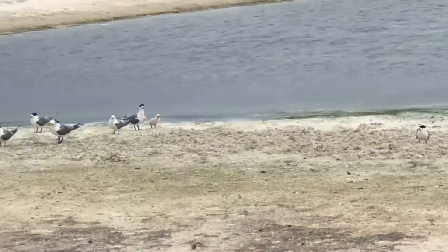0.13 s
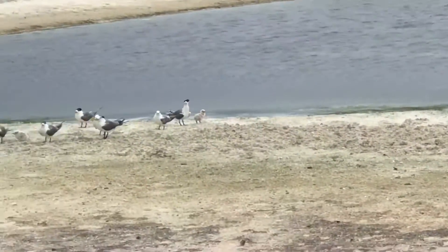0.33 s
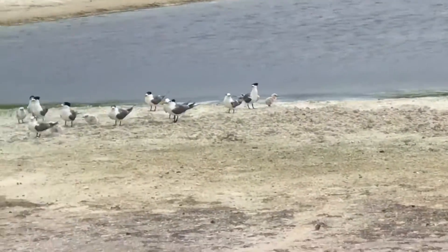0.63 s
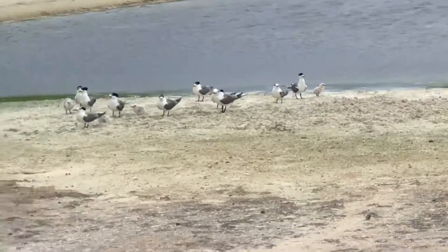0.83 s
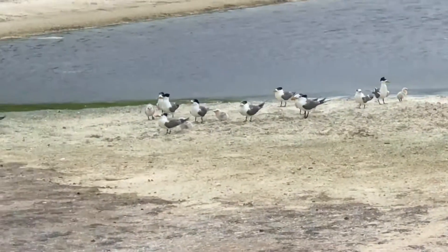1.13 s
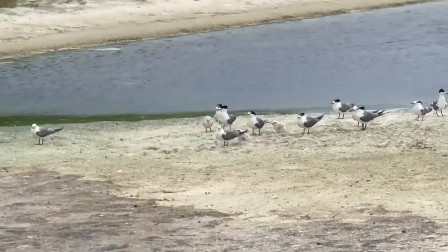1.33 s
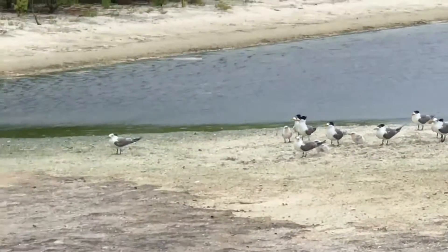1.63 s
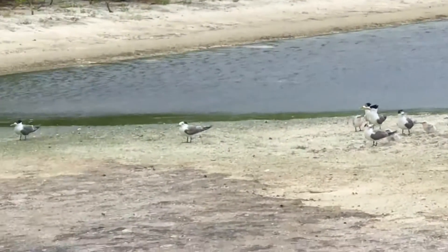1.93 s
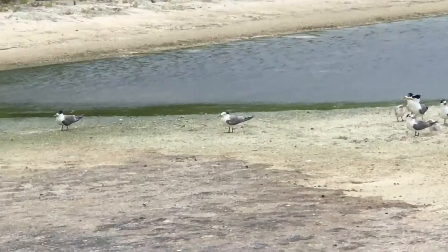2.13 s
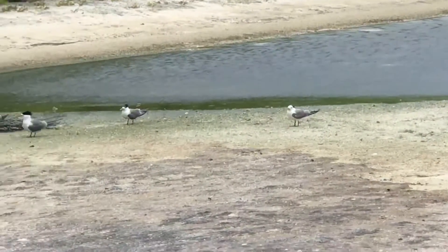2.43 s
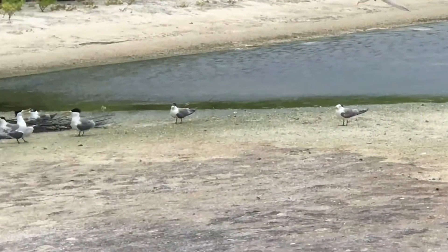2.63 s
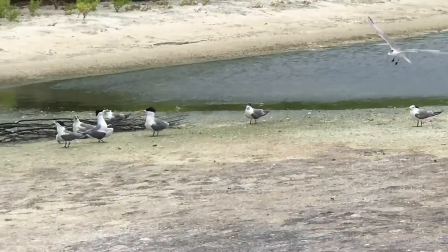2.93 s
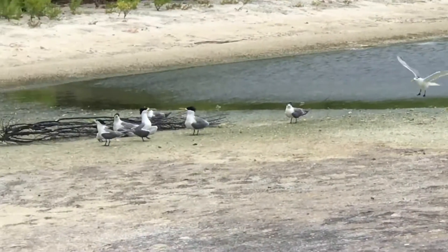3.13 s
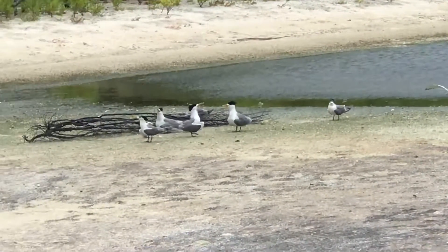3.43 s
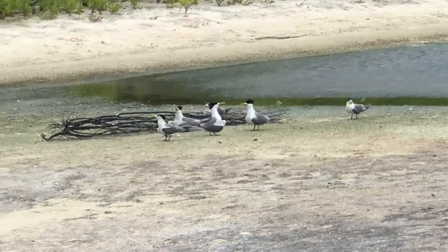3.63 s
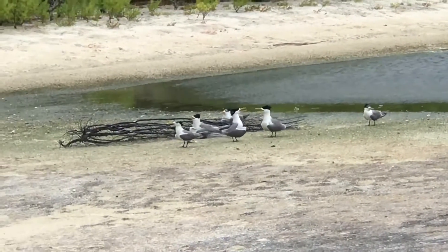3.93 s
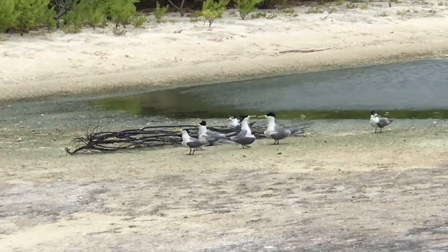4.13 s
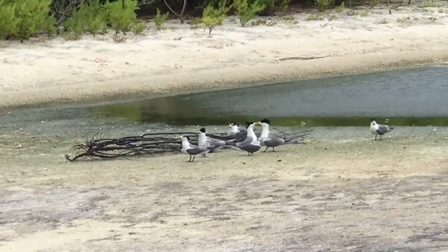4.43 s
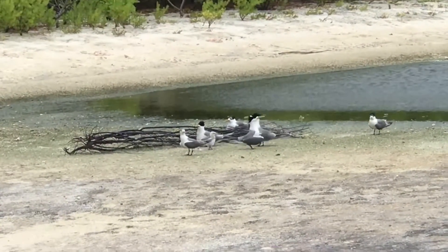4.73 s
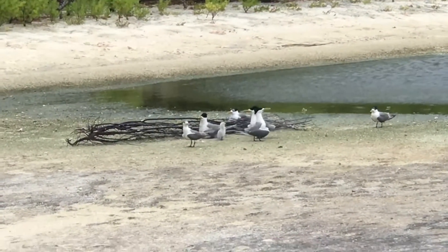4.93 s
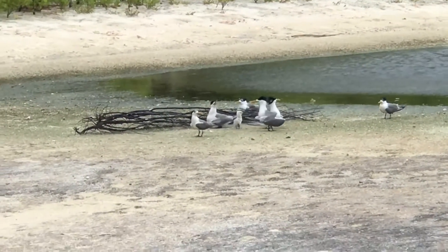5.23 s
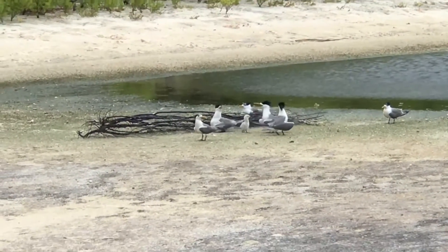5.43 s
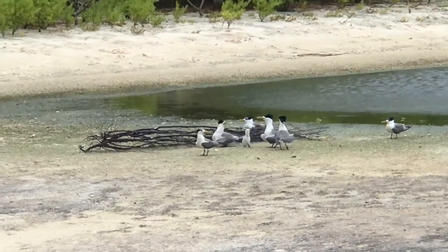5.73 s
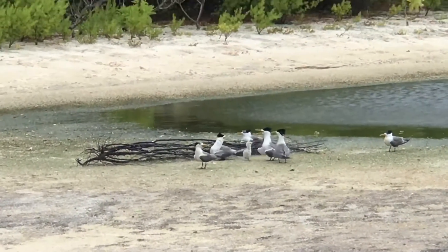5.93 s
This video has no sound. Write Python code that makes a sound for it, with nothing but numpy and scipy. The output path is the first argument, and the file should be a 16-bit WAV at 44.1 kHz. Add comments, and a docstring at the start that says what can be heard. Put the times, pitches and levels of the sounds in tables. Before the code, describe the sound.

Outdoors on a windy shore, low gusty rumble and fluttering slaps hit the microphone from the start, over faint hiss and dull overlapping cries of distant terns. From 0.1 to 0.9 s nearer birds give a rapid string of raspy, throbbing calls, brighter and clearer than the flock. They pause while wind bursts hard and crackles around 1 s, then resume at about 1.25 s with separate falling and arched rasps. Wind thumps again near 2 s. A long, rough growl runs from 2.6 to nearly 3 s in a calmer spell. From 3.4 s rising cries and short, hard barks crowd together, loudest around 3.8 to 4.3 s, with a sharp gust near 3.8 s. Another rising cry comes at 4.7 s. After 4.8 s dense slaps and tearing wind take over; weaker calls return from 5.5 s as a heavy gust peaks at 6 s.

```python
"""A flock of terns calls on a windy shore, some close and bright, many far and dull.
From the start filtered noise gives a gusty rumble, slaps on the microphone and a faint shore hiss.
Overlapping far cries lie beneath; near ones enter at 0.1 s, pause after 0.9 s, resume at 1.25 s.
Each cry is a stack of partials on a gliding pitch that rises, falls or bends, most chopped into throbs:
a long growl comes at 2.6 s, barks crowd in from 3.6 s, slaps thicken after 4.8 s, a gust peaks at 6 s."""
import sys
import numpy as np
from scipy import signal
from scipy.fft import rfft, irfft, next_fast_len
from scipy.io import wavfile
from scipy.ndimage import uniform_filter1d

SR = 44100
rng = np.random.default_rng(int(sys.argv[2]) if len(sys.argv) > 2 else 0)


def master_out(mix):
    """Clip the mix to full scale and print it as 16-bit PCM to the path in sys.argv[1]."""
    frames = np.transpose(np.atleast_2d(mix))
    ceiling = np.clip(frames, -1, 1)
    pcm = np.round(ceiling * 32767).astype(np.int16)
    wavfile.write(sys.argv[1], SR, pcm)


def boost_factor(decibels):
    """Convert a level in decibels to a linear amplitude factor."""
    exponent = np.asarray(decibels, float) / 20
    return 10 ** exponent


N = 267819
T = np.arange(N) / SR


def colour(x, points):
    """Linear filtering: weights the spectrum by (f/Hz, gain/dB) points joined on a log-frequency axis."""
    hz, db = np.transpose(points)
    size = next_fast_len(len(x))
    f = np.maximum(np.arange(size // 2 + 1) * SR / size, 1)
    gain = boost_factor(np.interp(np.log(f), np.log(hz), db))
    return irfft(rfft(x, size) * gain, size)[:len(x)]


def unit(x):
    """Normalisation: scales a signal to rms 1."""
    return x / np.sqrt(np.mean(x ** 2))


def walk(rate, count=N):
    """Low-passed noise: smooth chance that changes about rate times a second, spread about 1."""
    k = max(int(SR / rate), 1)
    smooth = uniform_filter1d(uniform_filter1d(rng.standard_normal(count), k), k)
    return smooth * np.sqrt(1.523 * k)


def add(out, s, sound):
    """Superposition: mixes a sound in at time s."""
    i = int(max(s, 0) * SR)
    out[i:i + len(sound)] += sound[:N - i]


# Gusts at the microphone: peak t/s, rumble level/dB, flutter level/dB,
# rise t/s and fall t/s over 10 dB of rumble
GUST_TABLE = [(0.0, -34, -22.5, .1, 0.039), (.33, -18.5, -29, 0.45, .1), (.63, -21, -24.5, 0.28, 0.076),
              (1.0, -16, -17.5, .13, .14), (1.14, -19.5, -20, 0.2, 0.054), (1.42, -23, -26, 0.099, 0.22),
              (1.7, -24.5, -34, 0.16, 0.26), (2.09, -17, -20, 0.41, 0.051), (2.26, -23.5, -34, 0.36, 0.23),
              (2.48, -17, -25, 0.04, .06), (2.56, -28, -35.5, 0.093, 0.56), (3.27, -26.5, -31.5, 0.038, .2),
              (3.6, -19, -30, 0.27, 0.065), (3.77, -15.5, -14.5, 0.038, 0.11),
              (3.83, -15, -11.5, 0.07, 0.078), (4.009, -24.5, -20, 0.27, 0.35),
              (4.43, -20, -27.5, 0.23, 0.025), (4.56, -19.5, -19.5, 0.032, 0.085),
              (4.83, -17.5, -16.5, 0.077, 0.35), (4.95, -13, -15.5, 0.19, 0.21),
              (5.28, -29, -19.5, 0.33, 0.59), (5.58, -22.5, -15, 0.57, 0.24),
              (5.999, -10, -16, 0.17, 0.081)]


def gusts():
    """Power addition: each gust builds and dies away in dB; gives rumble and flutter levels in dB."""
    lull_rumble_db, lull_flutter_db = -48.5, -51
    flutter_steeper = 1.506  # dB of flutter for each dB of rumble on the flanks of a gust
    s, rumble_db, flutter_db, rise, fall = np.transpose(GUST_TABLE)[:, :, None]
    t = T[::64]  # a coarse time grid is enough for slow levels
    down_db = 10 * np.where(t < s, (s - t) / np.abs(rise), (t - s) / np.abs(fall))

    def total(db, lull_db):
        """Incoherent summation: powers of all gusts and of the lull add."""
        power = np.sum(boost_factor(2 * db), axis=0) + boost_factor(2 * lull_db)
        return np.interp(T, t, 10 * np.log10(power))

    rumble_total = total(rumble_db - down_db, lull_rumble_db)
    return rumble_total, total(flutter_db - flutter_steeper * down_db, lull_flutter_db)


# Eddies that burst on the port: t/s, slap level/dB (lowered 7 dB when played), crack level/dB
SLAP_TABLE = [(0.013, -5, -25), (0.308, -10, -23), (0.352, -3.5, -21), (0.648, -6.5, -21.5),
              (0.862, -6.5, -51), (0.951, 2, -14), (0.987, -7, -6.5), (1.014, -6, -5), (1.08, -2.5, -3.5),
              (1.132, -2.5, -4), (1.476, -6, -39), (1.605, -2, -38), (1.708, -5, -43), (1.999, -6.5, -11),
              (2.084, -4.5, -28), (2.097, -3.5, -7), (2.473, -7.5, -44), (3.8, -19, -12), (3.829, -13, -25),
              (3.993, 1.5, -10), (4.202, -9.5, -40), (4.267, -10.5, -25), (4.412, -6, -39),
              (4.545, -7, -24), (4.601, -22, -16), (4.805, -6, -32), (4.848, -9, -1.5), (4.921, -7, -14),
              (4.956, -1, -3), (4.969, -6, -7), (4.983, -14, -1), (5.055, -31, -8), (5.126, -1, -45),
              (5.165, -2, -9.5), (5.194, -14, -7), (5.241, 2, -19), (5.332, -9, -46), (5.365, -4.5, -16),
              (5.444, -14, -13), (5.496, -11, -13), (5.54, -12, -12), (5.568, -10, -20),
              (5.592, -13, -13.5), (5.625, -17, -27), (5.865, -8, -24), (5.883, -7, -10.5),
              (5.934, -23, -4.5), (5.969, -4, -10.5), (6.009, -7, -37)]


def slaps():
    """Impulsive pressure: envelopes of a fast onset and decay for each slap and its briefer crack."""
    slap, crack = np.zeros(N), np.zeros(N)
    t = np.arange(int(.08 * SR)) / SR
    slap_shape = np.clip(t / 0.004, 0, 1) * np.exp(-(t / 0.014) ** 1.56)
    crack_shape = np.clip(t / 0.0019, 0, 1) * np.exp(-(t / 0.0064) ** 1.07)
    for s, slap_db, crack_db in SLAP_TABLE:
        add(slap, s, boost_factor(slap_db - 7) * slap_shape)
        add(crack, s, boost_factor(crack_db) * crack_shape)
    return slap, crack


# Spectra of three layers of wind noise, relative level per Hz: f/Hz, level/dB
RUMBLE_SPECTRUM = [(24, -34), (40, 5.5), (70, 3.5), (260, -7.5), (340, -22), (570, -120)]
FLUTTER_SPECTRUM = [(100, -2), (200, -1), (500, -2), (900, -14), (2000, -31.5), (5000, -72)]
TEARING_SPECTRUM = [(500, 3.5), (1000, 3), (2000, -8), (4000, -26), (9000, -63), (16000, -45)]


def wind():
    """Turbulence at the port: small eddies shake the upper layers harder than the rumble."""
    rumble_db, flutter_db = gusts()
    eddies = 1.97 * np.tanh(0.42 * walk(35.6) + 0.51 * walk(236))  # slow and fast eddies, bounded
    slap, crack = slaps()
    spectra = (RUMBLE_SPECTRUM, FLUTTER_SPECTRUM, TEARING_SPECTRUM)
    rumble, flutter, tearing = (unit(colour(rng.standard_normal(N), c)) for c in spectra)
    # tearing grows faster than the flutter as the flow quickens
    tear_db = -36 + 1.5 * (flutter_db + 22) + 6 * eddies
    rumble_gain = boost_factor(rumble_db + 3.17 * eddies) + 0.22 * slap
    flutter_gain = boost_factor(flutter_db - 3.5 + 4.98 * eddies) + slap * boost_factor(0.39 * eddies)
    tearing_gain = boost_factor(tear_db) + crack * boost_factor(1.7 * eddies)
    return rumble * rumble_gain + flutter * flutter_gain + tearing * tearing_gain


# Spectrum of the shore hiss, relative level per Hz: f/Hz, level/dB
SHORE_SPECTRUM = [(410, -28), (700, -5), (3260, -7), (7610, -20.5), (15800, -31)]


def shore():
    """Broadband noise: the faint hiss of ripples and leaves, its level wavering slightly."""
    hiss = unit(colour(rng.standard_normal(N), SHORE_SPECTRUM))
    return boost_factor(-48.5 + 0.74 * walk(11.0)) * hiss


# Response of the throat: f/Hz, gain/dB
THROAT_RESPONSE = [(500, -14), (1000, 2.5), (1800, 0.5), (4800, -7.5), (6200, -14.5), (7300, -23.5),
                   (10000, -38)]
# Hiss of air past the beak, relative weighting: f/Hz, gain/dB
BREATH_RESPONSE = [(6000, -19), (7800, -3.5), (9500, -0.5), (10800, -6.5), (13000, -1), (16000, -9)]


def cry(length, throb, first_hz, middle_hz, last_hz, rough, beak_hz, treble_db, join=0):
    """Source and filter: partials pass throat and beak, unsteady at the ends, gated by the throb."""
    t = np.arange(int(length * SR)) / SR
    edge = (2 * t / length - 1) ** 2  # 0 in the middle, 1 at both ends
    glide = np.polyfit([0, .5, 1], [first_hz, middle_hz, last_hz], 2)
    pitch = np.polyval(glide, t / length)
    # the membranes swing cleanly at full effort and tumble at the start and end
    chaos = np.clip(rough, 0, 1) * (.67 + .7 * edge)
    gate = boost_factor(1.9 * walk(60, count=len(t)))
    if throb > 20:  # throbs per s; otherwise the note is held
        beat = np.maximum(throb * t + .06 * walk(40, count=len(t)), 0)
        p = beat % 1  # place within the throb
        # three random values for each throb: loudness, pitch and steadiness
        own = rng.standard_normal((len(t) // 200 + 2, 3))[beat.astype(int)].T
        joined = join * (1 - edge)  # at full effort the voice carries on between puffs
        # each puff of air lasts about the same time: slow throbs leave gaps, fast ones run together
        puff = np.clip(p / throb / min(.013, 1 / throb), 0, 1)
        gate = throb / 450 + joined + boost_factor(2. * own[0]) * np.sin(np.pi * puff ** .65) ** 1.5
        # every throb mostly holds its own step of the glide
        steps = np.polyval(glide, np.clip((beat - p + 0.3) / throb / length, 0, 1))
        scoop = .1 * np.exp(-p / .25)  # the pitch scoops up as the air gets through
        pitch = (.3 * pitch + .7 * steps) * (1 + 0.0398 * rough * own[1] - scoop)
        chaos = chaos * boost_factor(2. * own[2])
    jitter = .3 * chaos ** 2 * walk(900, count=len(t))
    phase = 2 * np.pi * np.cumsum(pitch * (1 + jitter)) / SR
    partials = unit(sum(np.cos(k * phase + k * k) for k in range(1, 14)))
    # strong and weak swings alternate, which puts lines half-way between the partials
    buzz = partials * (1 + 1.3 * chaos * np.cos(phase / 2))
    buzz = buzz + .9 * chaos * rng.standard_normal(len(t))
    buzz = buzz / np.sqrt(1 + 0.19 * chaos ** 2)  # offsets loudness added by tumbling
    beak = [(0.3 * beak_hz, -12), (0.51 * beak_hz, -1), (beak_hz, 7), (1.72 * beak_hz, 0)]
    voice = unit(colour(colour(buzz, THROAT_RESPONSE), beak)) * gate
    breath = unit(colour(buzz + 0.98 * rng.standard_normal(len(t)), BREATH_RESPONSE))
    voice = voice + boost_factor(treble_db - 22.5) * breath * gate ** 1.54
    # long cries swell in, short ones start hard
    rise = np.clip(t / .003, 0, 1) * np.clip(.25 + t / length ** 2, 0, 1)
    swell = rise * np.clip((length - t) / 0.0049, 0, 1) * (1 - .5 * edge)
    return unit(voice * swell)


# Distant part of the flock: t/s, level/dB
FAR_LEVEL = [(0, -45), (.3, -33.5), (1.1, -43.5), (2.0, -49), (2.5, -63), (3.1, -41.5), (3.4, -46.5),
             (4.05, -52.5), (4.5, -40), (5.15, -62), (5.8, -43.5)]


def far_terns(count=70):
    """Superposition of many sources: overlapping dull cries down the shore, each at its own pitch."""
    out = np.zeros(N)
    for k, (a, b, c, d) in enumerate(rng.random((count, 4))):
        hz = 800 + 500 * a
        length, throb, rough = .08 + .1 * b, 55 + 30 * d, .4 + .35 * b
        sound = cry(length, throb, .92 * hz, hz, .9 * hz, rough, 2.8 * hz, treble_db=-8.)
        add(out, (k + d) * N / SR / count, boost_factor(10 * c) * sound)
    return unit(out) * boost_factor(np.interp(T, *np.transpose(FAR_LEVEL)))


# Near cries: start t/s, end t/s, kind, throb f/Hz (0 for a held note), middle pitch f/Hz, level/dB
NEAR_CRIES = [
    (0.107, 0.19, "peep", 76, 1360, -42.5), (0.161, 0.225, "clear", 79, 1226, -30.5),
    (0.224, 0.288, "rasp", 80, 1120, -31), (0.288, 0.405, "rise", 69, 1093, -32),
    (0.395, 0.462, "shrill", 0, 1260, -31), (0.46, 0.482, "hoarse", 83, 928, -40),
    (0.517, 0.77, "mutter", 85, 1114, -38.5), (0.811, 0.883, "pipe", 0, 1263, -41.5),
    (0.842, 0.917, "shrill", 66, 1156, -42), (1.248, 1.385, "hoarse", 69, 795, -43.5),
    (1.371, 1.471, "bending fall", 65, 1233, -28.5), (1.5, 1.588, "rasp", 66.5, 946, -33),
    (1.605, 1.696, "bright arch", 60.5, 1256, -30), (1.779, 1.886, "rasp", 67.5, 1250, -43),
    (1.889, 1.975, "bright arch", 59.5, 1120, -37), (1.987, 1.998, "peep", 0, 1290, -39.5),
    (2.115, 2.221, "peep", 0, 1070, -46.5), (2.159, 2.23, "hoarse", 71.5, 1047, -37),
    (2.234, 2.405, "rasp", 72.5, 1090, -34.5), (2.555, 2.613, "mutter", 47, 997, -41.5),
    (2.611, 2.962, "growl", 79.5, 914, -26), (2.704, 2.756, "peep", 26, 1256, -34),
    (2.837, 2.936, "fall", 0, 1230, -31.5), (2.992, 3.016, "fall", 56, 1028, -37.5),
    (3.019, 3.138, "rise", 80, 1260, -50), (3.165, 3.28, "growl", 84, 956, -37.5),
    (3.283, 3.337, "fall", 53, 990, -36), (3.42, 3.527, "climb", 71.5, 928, -29.5),
    (3.542, 3.615, "rise", 33, 893, -35.5), (3.625, 3.66, "bark", 61, 1125, -34.5),
    (3.658, 3.699, "mutter", 64.5, 781, -30), (3.716, 3.772, "mutter", 86, 953, -37),
    (3.779, 3.837, "bark", 64, 973, -26), (3.847, 3.895, "rise", 49, 986, -36.5),
    (3.927, 3.947, "bark", 49, 1040, -23), (3.959, 3.985, "hoarse", 60, 967, -22),
    (3.996, 4.08, "mutter", 74, 943, -35), (4.074, 4.119, "rise", 52, 1043, -24.5),
    (4.12, 4.154, "fall", 64.5, 1003, -24), (4.165, 4.206, "peep", 0, 1250, -48),
    (4.259, 4.362, "dull dip", 62.5, 1127, -24.5), (4.508, 4.532, "hoarse", 75, 1070, -32.5),
    (4.54, 4.594, "pipe", 61.5, 1203, -30), (4.601, 4.668, "mutter", 58, 1053, -30.5),
    (4.664, 4.809, "climb", 59, 1148, -26.5), (4.81, 4.854, "pipe", 0, 1285, -36.5),
    (4.864, 4.917, "mutter", 61, 1154, -36), (5.009, 5.048, "peep", 60, 1310, -43.5),
    (5.484, 5.528, "pipe", 64, 1173, -34), (5.546, 5.617, "bark", 60.5, 1080, -37),
    (5.637, 5.704, "pipe", 73.5, 1210, -38.5), (5.68, 5.779, "climb", 70.5, 1021, -35),
    (5.77, 5.861, "mutter", 78.5, 1043, -40.5), (5.84, 5.87, "pipe", 0, 1290, -43.5),
    (5.859, 5.924, "rise", 0, 930, -39.5), (6.011, 6.06, "peep", 71, 933, -49)]
# Kinds of cry: first and last pitch as shares of the middle pitch [ratio], beak resonance as a multiple
# of middle pitch [ratio], treble level/dB (lowered 22.5 dB in the cry),
# voice between the throbs [ratio to puff, sign ignored]
CRY_KINDS = {
    "climb": (.86, 1.36, 3, 0, 0.2), "dull dip": (1.2, 1.1, 2.5, -8.5, 0.3),
    "bending fall": (1.1, 0.76, 3.2, 1, 0.35), "bright arch": (1, .85, 3.3, 7.2, 0.018),
    "growl": (1.1, 1, 2.0, -10, -0.07), "rasp": (1.4, 0.6, 3, -1, 0.1),
    "clear": (1.15, 1.1, 3.5, -2, .4), "bark": (.98, 1.2, 3.7, 2.7, .05),
    "mutter": (1.0, 1.3, 3.0, -1, -0.8), "fall": (1.04, 0.98, 3.05, 1.8, 0.16),
    "rise": (.9, 1.05, 3.16, 1.9, 0.046), "shrill": (1.03, .91, 4.8, 14.7, .02),
    "pipe": (1.2, 1.14, 4, 1.5, -1.3), "hoarse": (.92, .93, 2.8, 5.8, .1),
    "peep": (1.4, 0.8, 2.9, -11, -0.5)}
# How unsteadily the membranes swing in each kind [0-1]
ROUGHNESS = {
    "climb": .52, "dull dip": .45, "bright arch": .36, "growl": .64, "bending fall": .4, "rasp": .72,
    "clear": .2, "bark": .42, "mutter": .45, "fall": .48, "rise": .45, "shrill": .33, "pipe": .3,
    "hoarse": .75, "peep": .15}


def near_terns():
    """Amplitude-modulated tones: the cries that stand out, each with the pitch and timbre of its kind."""
    out = np.zeros(N)
    for start, end, kind, throb, hz, db in NEAR_CRIES:
        first, last, beak, treble_db, join = CRY_KINDS[kind]
        sound = cry(end - start, throb, first * hz, hz, last * hz, ROUGHNESS[kind], beak * hz,
                    treble_db, abs(join))
        add(out, start, boost_factor(db) * sound)
    return out


def scatter(x, t60=0.15, wet_db=-12):
    """Diffuse reflection: sand, water and scrub send back a short blur, decaying 60 dB in t60 seconds."""
    t = np.arange(int(.15 * SR)) / SR
    tail = rng.standard_normal(len(t)) * np.exp(-np.log(1000) * t / t60)
    tail = tail / np.sqrt(np.sum(tail ** 2))
    return x + boost_factor(wet_db) * signal.fftconvolve(x, tail)[:N]


def scene():
    """Superposition in open air: scattered birds, the shore, and wind right on the microphone."""
    birds = scatter(near_terns() + far_terns())
    return (birds + shore() + wind())[None]


def low_pass(x):
    """Removes everything above the highest recorded frequency."""
    return signal.sosfilt(signal.butter(12, 15970, fs=SR, output="sos"), x)


def record(dry):
    """High-pass and saturation: the microphone drops deep bass, the converter rounds off hard slaps."""
    high_pass = signal.butter(2, 51.6, "high", fs=SR, output="sos")  # cutoff in Hz
    heard = signal.sosfilt(high_pass, dry)
    finished = heard / (1 + np.abs(heard) ** 6) ** (1 / 6)  # soft limit at full scale
    return low_pass(finished)


dry = scene()
out = record(dry)
master_out(out)
```